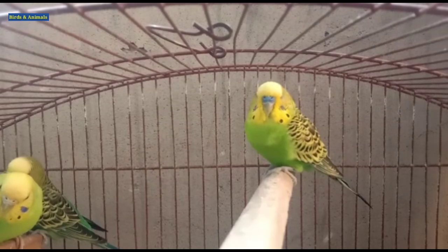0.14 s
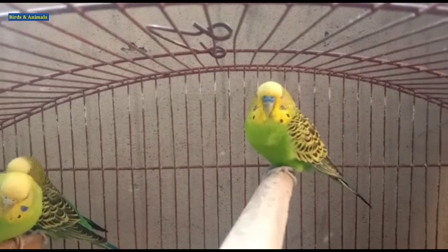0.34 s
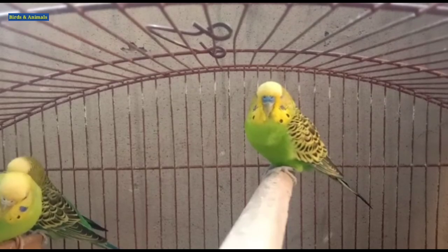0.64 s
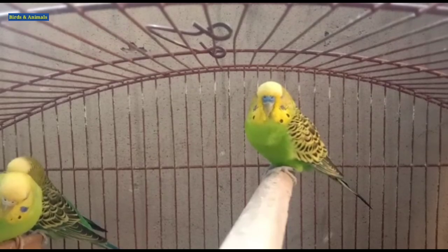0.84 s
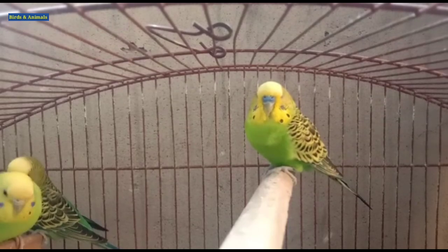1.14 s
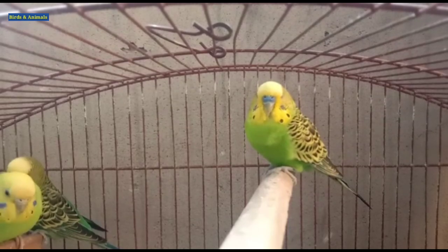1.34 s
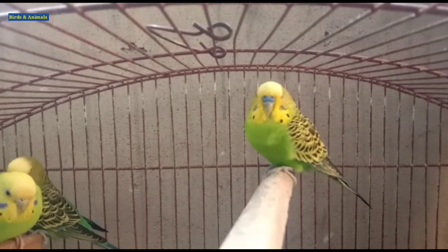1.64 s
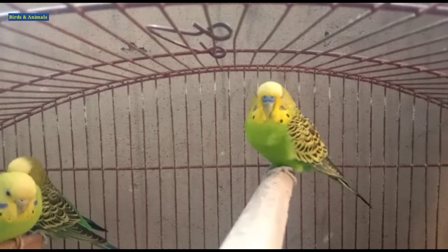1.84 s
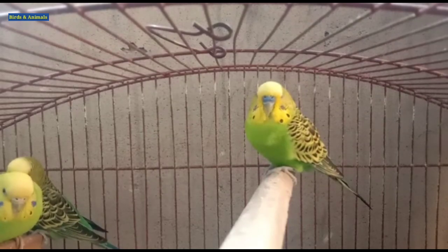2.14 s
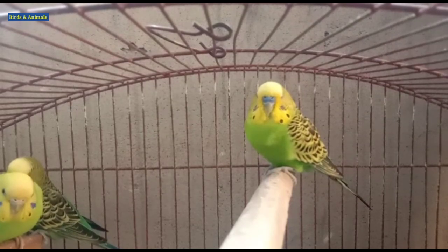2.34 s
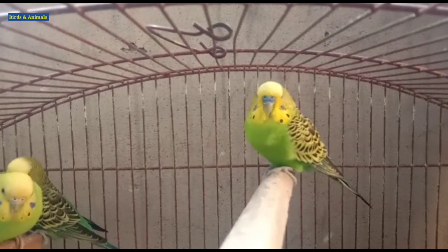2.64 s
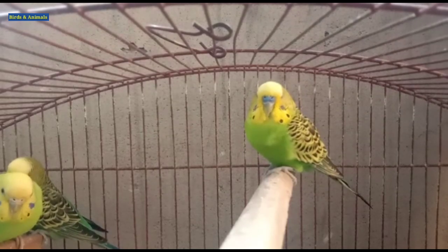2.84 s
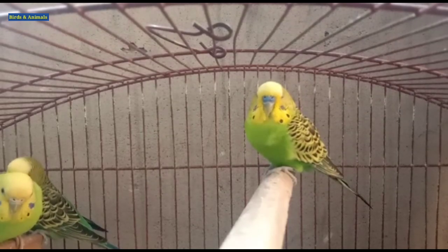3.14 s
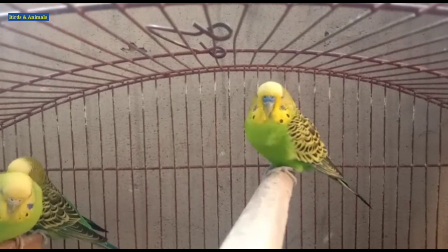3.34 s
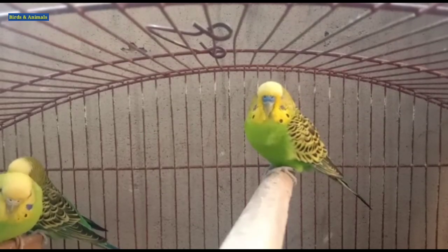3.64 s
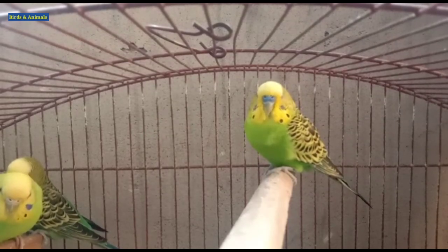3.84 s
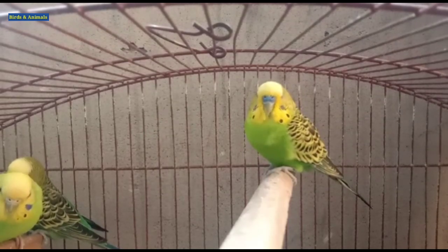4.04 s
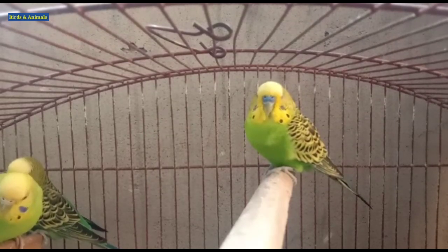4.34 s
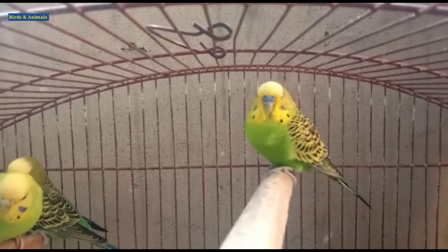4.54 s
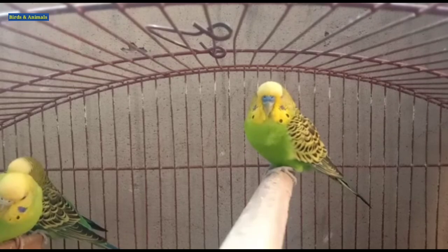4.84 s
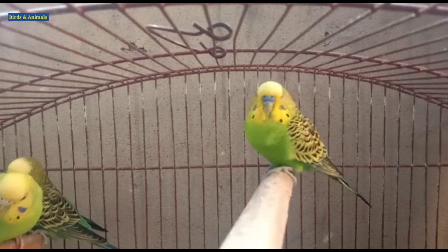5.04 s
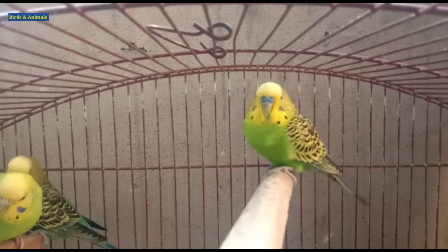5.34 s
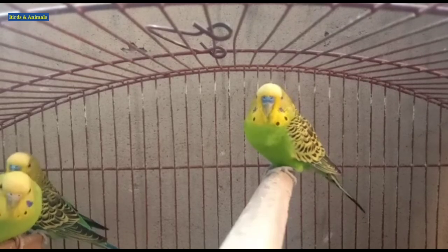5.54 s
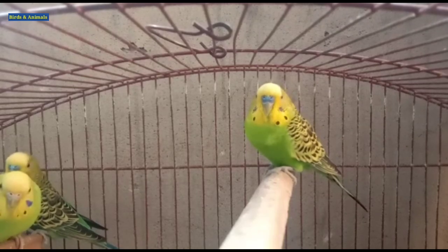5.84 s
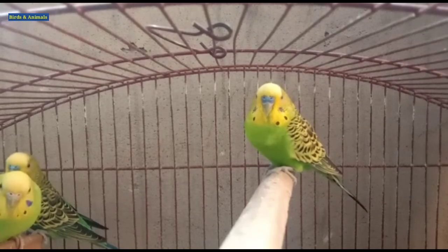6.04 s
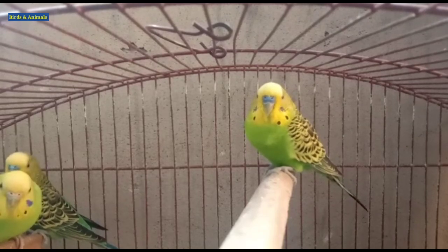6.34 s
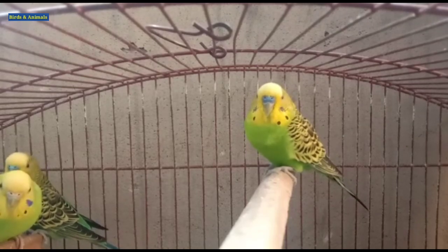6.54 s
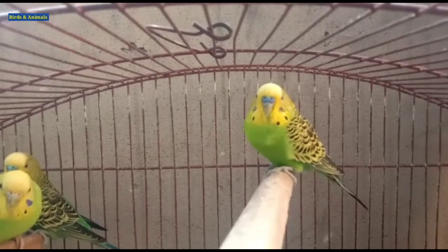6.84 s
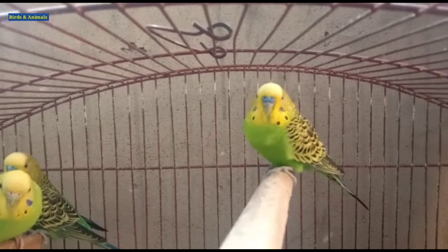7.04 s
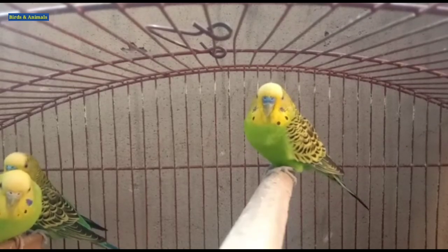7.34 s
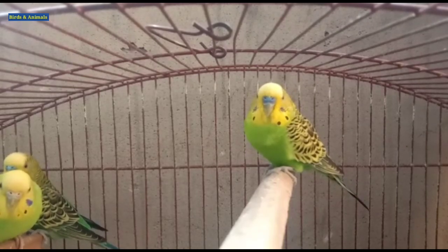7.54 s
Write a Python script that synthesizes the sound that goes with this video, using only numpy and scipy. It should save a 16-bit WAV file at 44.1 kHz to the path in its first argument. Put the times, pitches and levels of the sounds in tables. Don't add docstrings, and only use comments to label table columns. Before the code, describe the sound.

Indoors, one budgerigar in a wire cage chatters in fast, uneven bursts: plunging whistles, arching chirps, croaky and scratchy tones. Tiny beak clicks and dry rattles sit between phrases. After a pause near five seconds, a scratchy call comes with soft hollow thumps, then more warbling and a sharp crackling rattle. The bird is close, with short wall echoes, muffled rumble, a faint whine and very distant peeps.

```python
import sys
import numpy as np
from scipy import signal
from scipy.fft import rfft, irfft
from scipy.io import wavfile
from scipy.ndimage import uniform_filter1d

SR = 44100
rng = np.random.default_rng(int(sys.argv[2]) if len(sys.argv) > 2 else 0)


def gain_from_decibels(decibels):
    exponent = np.asarray(decibels, float) / 20
    return 10 ** exponent


def store_pcm(level_fs):
    pcm = np.round(np.clip(level_fs, -1, 1) * 32767).astype(np.int16)
    wavfile.write(sys.argv[1], SR, np.atleast_2d(pcm).T)


N = 338247


def slow(hz):
    r = np.exp(-2 * np.pi * hz / SR)
    drift = signal.lfilter([1], [1, -2 * r, r * r], rng.standard_normal(N + 4000))[4000:]
    return drift / drift.std()


def resonate(x, hz, width):
    r = np.exp(-np.pi * width / SR)
    zeros = np.array([1, 0, -1]) * (1 - r * r) / 2
    return signal.lfilter(zeros, [1, -2 * r * np.cos(2 * np.pi * hz / SR), r * r], x)


def in_time(rows):
    return gain_from_decibels(np.interp(np.arange(N) / SR, *np.transpose(rows)))


def noise_gate(bird, shut_db=-16, open_db=-52, hold_s=0.067):
    heard = uniform_filter1d(bird ** 2, size=400) > gain_from_decibels(2 * open_db)
    heard = np.roll(heard, -900)
    r = np.exp(-1 / (hold_s * SR))
    opening = np.minimum(2.0 * signal.lfilter([1 - r], [1, -r], heard), 1)
    return gain_from_decibels(shut_db * (1 - opening))


# time in seconds, level in dB.
RUMBLE_CURVE = [(0, -58), (.6, -53), (1.15, -55), (1.6, -49.5), (2.1, -56.5), (2.7, -51.5), (3.2, -56),
                (3.7, -65.5), (4.3, -60.5), (4.8, -55), (5.25, -53), (5.55, -43), (5.85, -63), (6.2, -70),
                (6.7, -60), (7.2, -64.5), (7.67, -51.5)]
# time in seconds, level in dB.
WHINE_CURVE = [(1.2, -94), (1.9, -55), (3.0, -53), (5.35, -61), (5.5, -88)]
# start in seconds, length in seconds, pitch in Hz, level in dB.
DISTANT_PEEPS = [(1.147, 0.17, 2895, -76.5), (1.803, 0.27, 2270, -73.5), (0.998, .18, 1086, -78),
                 (1.757, 0.1, 2630, -78), (1.838, 0.056, 6300, -80.5), (2.9, 0.14, 1260, -63),
                 (3.898, 0.078, 3900, -84), (3.92, 0.078, 3100, -72.5), (5.14, 0.2, 3220, -78)]


def background(gate):
    t, noise = np.arange(N) / SR, rng.standard_normal((4, N))
    low = gain_from_decibels(29.0) * resonate(resonate(noise[0], 96, 44), 76, 52) * gain_from_decibels(4.0 * slow(12.0))
    wash = gain_from_decibels(-52) * resonate(resonate(noise[1], 310, 460), 430, 2500) * gain_from_decibels(0.7 * slow(15))
    whine = gain_from_decibels(20.5) * resonate(resonate(noise[2], 895, 14), 895, 31)
    whine += gain_from_decibels(6.5) * resonate(resonate(noise[3], 800, 100), 850, 190)
    peeps = np.zeros(N)
    for s, length, hz, db in DISTANT_PEEPS:
        sounding = (t > s) * (t < s + length)
        peeps += gain_from_decibels(db + 22.5) * resonate(noise[3] * sounding, hz, 80)
    gated = gate * (in_time(RUMBLE_CURVE) * low + np.sqrt(gate) * wash)
    return gated + in_time(WHINE_CURVE) * gain_from_decibels(3.1 * slow(5.2)) * whine + peeps


# frequency in Hz, level in dB.
THROAT_COLOUR = [(600, -26.5), (1100, -1.5), (2300, -3.5), (3100, 1.5), (4450, -7), (5900, -3.5),
                 (7300, -18), (8400, -25), (10300, -24.5), (12800, -38), (15300, -32), (16500, -63)]


def throat_db(hz):
    colour_hz, colour_db = np.transpose(THROAT_COLOUR)
    return np.interp(np.log(hz), np.log(colour_hz), colour_db)


def through_throat(x, tilt_db, depth=1.05):
    hz = np.arange(1, 1026) * SR / 2050
    cepstrum = irfft(np.log(gain_from_decibels(depth * throat_db(hz) + tilt_db * np.log2(hz / 3000))))
    cepstrum[1:1024] *= 2
    cepstrum[1025:] = 0
    pulse = irfft(np.exp(rfft(cepstrum)))[:512]
    return signal.fftconvolve(x, pulse / np.sqrt(np.sum(pulse ** 2)))[:N]


# peak time in seconds, peak level in dB.
BEAK_CLICKS = [(0.458, -44.5), (1.22, -50), (2.337, -48), (2.919, -46.5), (3.286, -60), (5.395, -36),
               (5.423, -31), (5.436, -33), (5.568, -29), (5.586, -33), (5.624, -40), (5.909, -48),
               (6.501, -32), (6.931, -45), (7.387, -49.5)]
# start in seconds, level in dB, time to fall 60 dB in seconds.
AIR_PUFFS = [
    (0, -32.5, 0.26),
    (2.919, -51.5, 0.18),
    (3.105, -55, 0.41),
    (5.4, -46.5, 1),
    (5.498, -41.5, 0.33),
]


def beak_and_air():
    clicks, puffs, t = np.zeros(N), np.zeros(N), np.arange(N) / SR
    for s, db in BEAK_CLICKS:
        clicks += (t >= s) * gain_from_decibels(db - 60 * np.abs(t - s) / 0.047)
    for s, db, t60 in AIR_PUFFS:
        puffs += (t >= s) * gain_from_decibels(db - 60 * np.abs(t - s) / t60)
    noise = rng.standard_normal((2, N)) * gain_from_decibels(4.3 * slow(90))
    bright = through_throat(clicks * noise[0], tilt_db=0.5, depth=0.55)
    return bright + through_throat(puffs * noise[1], tilt_db=19.5, depth=1.77)


# start in seconds, end in seconds, slaps per second,
# level in dB, unevenness from 0 to 1.
SLAP_TRAINS = [(0.255, 0.27, 1260, -49.5, 0.14), (0.273, 0.297, 500, -29.5, 0.49),
               (0.314, 0.329, 310, -33.5, 0.5), (3.102, 3.16, 750, -52.5, 0.5),
               (3.129, 3.248, 120, -50.5, 0.01), (5.769, 5.855, 118, -47, 0.08),
               (6.371, 6.378, 600, -22.5, 0.3), (6.723, 6.747, 134.5, -45.5, 0.04),
               (6.748, 6.817, 116, -43.5, 0.03)]
# time in seconds, level in dB.
SINGLE_SLAPS = [(6.311, -33), (6.318, -29.5), (6.325, -19), (6.328, -21), (6.333, -16), (6.338, -21),
                (6.343, -23), (6.349, -20), (6.352, -17.5), (6.358, -23), (6.366, -31), (7.569, -43),
                (7.576, -29.5), (7.582, -23), (7.587, -21)]


def rattles():
    slaps = np.zeros(N)
    for s, end, per_s, db, uneven in SLAP_TRAINS:
        chance = rng.standard_normal((40, 2))
        at = s + np.cumsum(np.exp(uneven * chance[:, 0])) / per_s - 1 / per_s
        keep = at < end
        strength = gain_from_decibels(db + 8 * uneven * chance[keep, 1]) * np.sqrt(SR / per_s)
        slaps[(at[keep] * SR).astype(int)] += strength
    s, db = np.transpose(SINGLE_SLAPS)
    slaps[(s * SR).astype(int)] += gain_from_decibels(db + 12.5)
    slaps += .7 * np.roll(slaps, int(.0022 * SR))
    bursts = signal.lfilter([.05], [1, -.98], slaps) * rng.standard_normal(N)
    return through_throat(.5 * slaps + bursts, tilt_db=-2.0, depth=1.21)


def learned(figure, renditions):
    sharper_per_db = .004
    notes = []
    for cue, end, slowness, *parts_db in renditions:
        rows = []
        for part, part_db in zip(figure, parts_db):
            sharper = 1 + sharper_per_db * (part_db + 22)
            for s, hz, glide, db, voice in part:
                rows.append((cue + s * slowness, hz * sharper, glide / slowness, db + part_db, voice))
        untils = [row[0] for row in rows[1:]] + [end]
        for (s, hz, glide, db, voice), until in zip(rows, untils):
            hz_to = max(hz + 1e3 * glide * (until - s), 700)
            notes.append((s, hz, hz_to, db, voice))
    return notes


PHRASE_STOPS = [0.422, 0.636, 0.807, 0.984, 1.252, 1.498, 2.141, 2.266, 2.603, 3.248, 3.454, 3.812, 4.165,
                4.6, 4.677, 4.899, 5.674, 5.739, 5.867, 5.929, 6.074, 6.469, 6.634, 6.691, 6.924, 6.938,
                7.301, 7.601]
# noisy share of the power from 0 to 1, overtones against the
# fundamental in dB, depth of the throb from 0 to 1.
VOICE_QUALITIES = dict(pure=(0.026, -21.5, .22), reedy=(0.02, -9.5, .15), rich=(.015, 4, .1),
                   husky=(.15, -18, .6), croaky=(.15, 1, .4), harsh=(0.6, -20, .5), rasping=(.4, 4, .3),
                   shrill=(.45, 14, .35))
# start in seconds, pitch from in Hz, pitch to in Hz, level in dB.
PURE_NOTES = [(0.463, 3710, 4199, -33.5), (.572, 2407, 2117, -28), (.59, 2095, 1997, -22.5),
              (.938, 2104, 1802, -23), (1.438, 1681, 2118, -21.5), (2.176, 3545, 2965, -33),
              (2.194, 3505, 2827, -39), (2.218, 3366, 2701, -34.5), (2.345, 4150, 4000, -48),
              (3.599, 5750, 5590, -36.5), (3.608, 5412, 5099, -27.5), (3.62, 5128, 4052, -24.5),
              (3.629, 4010, 4104, -23.5), (3.675, 3249, 3378, -13), (3.688, 2937, 2924, -17.5),
              (3.703, 2989, 3018, -16.5), (3.718, 3201, 3189, -13.5), (3.741, 2472, 2352, -14.5),
              (3.757, 2316, 2202, -20), (3.777, 2072, 1970, -21), (4.014, 2088, 1751, -36),
              (4.024, 1724, 1826, -36.5), (4.053, 1849, 2109, -28), (4.098, 2074, 1962, -29.5),
              (4.139, 1892, 1135, -28.5), (5.731, 2830, 3262, -26), (5.917, 3308, 3187, -31.5),
              (5.999, 2360, 2494, -27.5), (6.821, 2660, 2860, -23.5), (6.848, 3417, 3150, -24),
              (6.881, 1954, 2033, -26), (6.905, 2962, 2286, -21.5), (6.915, 2320, 2428, -26.5),
              (7.201, 3190, 2695, -14), (7.21, 2673, 3446, -12), (7.244, 3300, 3050, -14.5),
              (7.636, 2227, 2446, -18)]
REEDY_NOTES = [(.472, 4197, 3391, -24.5), (.485, 3397, 2383, -20.5), (.534, 3110, 2378, -18.5),
               (.736, 1635, 1741, -20), (.882, 2890, 2400, -21), (2.069, 885, 1095, -28.5),
               (2.097, 938, 955.5, -36), (2.252, 1733, 1639, -29), (2.376, 1905, 1474, -28.5),
               (2.382, 1462, 1451, -27), (2.53, 2775, 3469, -13), (2.562, 3350, 2590, -13),
               (3.433, 1992, 1505, -29), (4.155, 1175, 1241, -31), (5.6, 3656, 2783, -27),
               (5.638, 1969, 1824, -33.5), (5.946, 1457, 1534, -34.5), (6.06, 1636, 1458, -35),
               (6.447, 2105, 1566, -27.5), (6.456, 1560, 1506, -24), (6.607, 2041, 1950, -30),
               (1.364, 1500, 1100, -30), (6.505, 3381, 3760, -24), (6.566, 1917, 1257, -23.5),
               (6.59, 3318, 2240, -18), (6.674, 1593, 1894, -21.5), (7.616, 1605, 1295, -26.5)]
RICH_NOTES = [(0.664, 1927, 1813, -21), (0.693, 1547, 1086, -29.5), (1.235, 1531, 1494, -19.5),
              (2.002, 1067, 910, -22), (2.03, 895.5, 1081, -26.5), (2.049, 1026, 836, -32),
              (2.518, 3593, 2743, -21), (2.523, 2758, 2789, -14.5), (6.42, 880, 1152, -15.5),
              (6.426, 1148, 936, -15), (6.435, 950, 1157, -18.5), (6.528, 3078, 1937, -22.5),
              (6.932, 1990, 1758, -21.5)]
HUSKY = [(0.515, 3114, 3052, -17.5), (.618, 1400, 1200, -37), (.779, 4259, 3597, -12),
         (0.844, 3259, 2636, -35), (.922, 2414, 2526, -24), (.973, 1643, 1300, -32.5),
         (1.309, 2992, 3510, -37), (1.313, 3508, 2703, -30.5), (1.318, 1760, 1701, -32),
         (1.328, 2098, 2607, -38), (1.335, 2708, 3056, -33.5), (1.34, 2146, 1751, -33),
         (1.35, 1754, 1532, -36), (1.393, 2597, 3038, -27), (1.4, 2952, 2446, -28),
         (1.412, 2606, 2957, -28), (1.418, 2896, 2404, -28.5), (1.46, 3057, 2965, -21.5),
         (1.468, 2850, 2152, -27.5), (1.476, 2196, 1900, -25), (2.371, 3530, 2018, -41),
         (3.73, 2933, 2907, -22), (2.235, 1991, 2592, -36), (2.244, 2596, 1467, -24),
         (3.226, 2600, 2028, -41), (4.876, 1907, 1611, -17), (4.892, 1150, 1030, -34),
         (5.848, 2390, 2963, -27), (5.853, 2859, 2243, -26.5), (5.956, 1945, 2044, -36.5),
         (5.971, 2386, 3362, -29.5), (5.976, 3333, 2830, -31.5), (5.989, 2515, 2300, -36.5),
         (6.01, 3053, 3563, -33.5), (6.026, 3586, 2887, -35.5), (6.046, 2410, 1890, -37),
         (6.682, 2897, 3135, -18.5), (6.843, 1570, 1424, -28.5), (6.871, 3157, 1920, -26.5),
         (6.9, 1897, 3353, -26.5), (7.294, 2246, 986, -28), (7.586, 2428, 2880, -27),
         (7.651, 1910, 2600, -33.5)]
CROAKY_NOTES = [(0.369, 715.6, 883.5, -25), (.387, 860, 1524, -26), (.411, 1720, 1630, -26.5),
                (.612, 1904, 1500, -20), (0.745, 2830, 3001, -15), (.865, 1624, 1543, -24),
                (1.484, 1805, 1493, -25), (1.383, 1104, 1888, -32), (1.49, 1294, 1101, -34.5),
                (2.583, 1981, 1759, -21), (3.448, 1607, 1794, -37), (3.645, 2294, 1344, -25.5),
                (3.654, 1341, 1253, -29.5), (3.802, 1931, 1887, -35.5), (5.578, 2652, 2525, -24),
                (5.668, 1491, 2330, -30.5), (5.721, 1583, 1863, -25.5), (6.574, 1285, 1642, -26.5),
                (6.584, 2290, 3282, -23)]
HARSH = [(.506, 2287, 3390, -20.5), (.756, 3102, 3991, -29.5), (.794, 3595, 2901, -13),
         (3.64, 4123, 3589, -30.5), (3.661, 2809, 2098, -24.5), (3.669, 2215, 2879, -26.5),
         (2.546, 3166, 4341, -22), (4.565, 3161, 3930, -17.5), (5.459, 3465, 3405, -33.5),
         (5.498, 3979, 3600, -23.5), (5.56, 1283, 1812, -31), (6.836, 3025, 1360, -18.5),
         (7.228, 3510, 2328, -30), (7.236, 2510, 3630, -25), (7.282, 2843, 1824, -16)]
RASPING_NOTES = [(4.521, 1697, 2396, -28), (4.53, 2791, 3108, -22), (4.575, 3758, 3415, -21.5),
                 (4.633, 1499, 2300, -30), (4.639, 2400, 3400, -20), (4.65, 3430, 3301, -15),
                 (4.665, 3224, 3124, -16), (5.465, 3281, 3360, -17), (5.477, 3381, 3523, -10),
                 (5.511, 3352, 3420, -33), (5.595, 3036, 3504, -31), (5.631, 3250, 1671, -28)]
SHRILL_NOTES = [(0.761, 2530, 3080, -15), (0.77, 3103, 2685, -14.5), (4.543, 2873, 3019, -9.5)]
# seconds after the cue, pitch in Hz, glide in kHz per second,
# level within the part in dB, voice.
DIVE_FIGURE = [
    [(-.036, 4950, 45, -2, "pure"), (-.028, 5318, -95.5, -3, "pure"), (-.015, 4181, 0, -15.5, "husky")],
    [(-.001, 2700, -190, -1.5, "husky"), (.006, 1330, -5, -4, "reedy"), (.017, 1250, 3, -13, "reedy")],
]
ARCH_FIGURE = [
    [(-.020, 3300, 40, -12.5, "pure"), (-.010, 3700, -95.5, -10.5, "husky"), (0.0, 2750, 9.5, 1, "pure"),
     (.023, 2976, 45, 0.5, "pure"), (.033, 3450, -73.5, -4.5, "husky")],
    [(.047, 2350, -20, -3.5, "husky"), (.057, 2150, -7.5, 1.5, "pure")],
]
SLIDE_FIGURE = [
    [(-.023, 4908, 25, -10, "pure"), (-.012, 5150, -120, -14, "pure"), (0.0, 3660, -30.5, 2, "pure"),
     (.013, 3314, -22, 3.5, "pure"), (.034, 2750, -28, -4.5, "husky"), (.044, 2480, -6, 1, "pure"),
     (.058, 2237, -45.5, -3.5, "croaky"), (.069, 2950, 9, 2, "pure"), (.082, 3089, -14, 0, "pure"),
     (.094, 2600, -2, -0.5, "reedy")],
    [(.129, 2382, -64, 0.74, "croaky")],
]
# cue in seconds, end in seconds, slowness as a factor,
# first part level in dB, second part level in dB.
DIVE_CUES = [(2.759, 2.78, 0.91, -19.5, -29.5), (3.321, 3.329, .72, -57, -39), (4.757, 4.773, 1, -19, -24),
             (7.051, 7.07, 0.93, -16.5, -21.5)]
ARCH_CUES = [(2.417, 2.509, 0.91, -24, -27.5), (2.806, 2.881, 0.92, -31, -32),
             (3.355, 3.431, 1.04, -37, -30.5), (4.795, 4.876, 1.03, -14.5, -25),
             (7.091, 7.188, 0.92, -17.5, -24.5)]
SLIDE_CUES = [(1.564, 1.707, .98, -20, -26), (4.224, 4.371, 1.01, -22, -29)]


def controls():
    tables = (PURE_NOTES, REEDY_NOTES, RICH_NOTES, HUSKY, CROAKY_NOTES, HARSH, RASPING_NOTES, SHRILL_NOTES)
    notes = [(*row, voice) for table, voice in zip(tables, VOICE_QUALITIES) for row in table]
    notes += learned(DIVE_FIGURE, DIVE_CUES) + learned(ARCH_FIGURE, ARCH_CUES)
    notes += learned(SLIDE_FIGURE, SLIDE_CUES)
    notes.sort()
    stops = [row[0] for row in notes] + [row[1] for row in DIVE_CUES + ARCH_CUES + SLIDE_CUES]
    stops = np.sort(stops + list(PHRASE_STOPS) + [N / SR])
    out, bends = np.tile([[0.], [-20], [0], [0]], N), []
    for s, hz_from, hz_to, db, voice in notes:
        a, b = int(s * SR), int(stops[stops > s][0] * SR)
        share, over_db, throb = VOICE_QUALITIES[voice]
        over_db = over_db - 1.5 * np.log2(hz_from / 2500)
        out[:, a:b] = [[gain_from_decibels(db)], [over_db], [share], [throb]]
        bends += [(a, np.log(hz_from)), (b - 1, np.log(hz_to))]
    log_hz = np.interp(np.arange(N), *np.transpose(bends))
    rounding = (70, 140, 150, 100, 100)
    return [uniform_filter1d(row, size) for row, size in zip((log_hz, *out), rounding)]


# time in seconds, level in dB.
BEAK_FACING = [(.3, 1.5), (.7, 2.5), (.95, 3.5), (1.4, -6.5), (1.65, 1.5), (2.1, -9.5), (2.55, 2),
               (2.8, -6), (3.4, 9), (3.7, -4), (4.1, -14.5), (4.3, -9.5), (4.6, -1), (4.85, -6), (5.5, -1),
               (6.0, -9.5), (6.55, -6.5), (7.05, -15.5), (7.6, -25)]
# frequency in Hz, level in dB.
OPEN_BEAK = [(7600, -39), (8600, -12.5), (10300, -2), (11600, -8.5), (12500, -16.5), (13800, -7),
             (15200, -0.5), (16000, -30.5)]


def warble(fall_db=-6.0, air=0.23, beat_hz=195, sizzle_db=-33, sheen_db=-30, order=8):
    log_hz, level, over_db, rough, throb = controls()
    rough = np.clip(rough, 0, 1)
    level = level / (1 + (np.gradient(log_hz) / 0.012) ** 2)
    level = uniform_filter1d(level, size=50)
    shaky = .011 * (1 + 9 * rough) + .008 / (1 + (level / .03) ** 2)
    hz = np.exp(log_hz + shaky * slow(60) + .09 * rough * slow(350))
    phase = 2 * np.pi * np.cumsum(hz) / SR

    k = np.arange(2, 15)[:, None]
    weights = gain_from_decibels(1.19 * throat_db(k * hz) + fall_db * np.log2(k)) * (k * hz < .38 * SR)
    unsteady = gain_from_decibels(3.5 * slow(70) - 1)[(np.arange(N) + 9000 * k) % N]
    overtones = np.sum(weights * unsteady * np.sin(k * phase + k ** 2), axis=0)
    overtones /= np.sqrt(np.sum(weights ** 2, axis=0))

    beak_hz, beak_db = np.transpose(OPEN_BEAK)
    shine = gain_from_decibels(np.interp(np.log(k * hz), np.log(beak_hz), beak_db, right=-99) + sheen_db)
    sheen = np.sum(shine * unsteady * np.sin(k * phase), axis=0)
    sheen = sheen * (.8 + .6 * slow(300)) * in_time(BEAK_FACING)

    beaded = gain_from_decibels(2.2 * slow(75)) * np.sin(phase)
    tone = (beaded + gain_from_decibels(over_db) * overtones) * np.sqrt(2 / (1 + gain_from_decibels(2 * over_db)))
    smear = tone * slow(250)
    breath = through_throat(rng.standard_normal(N), tilt_db=12.5, depth=1.5)
    breath *= gain_from_decibels(1.1 * np.minimum(over_db + 7.0, 8.0))
    beat_phase = 2 * np.pi * np.cumsum(beat_hz * (1 + 0.072 * slow(27.84))) / SR
    beats = 1 + throb * np.cos(beat_phase)

    fizz_band = signal.butter(5, [14300, 15700], "band", fs=SR, output="sos")
    sizzle = signal.sosfilt(fizz_band, rng.standard_normal(N))
    sizzle *= gain_from_decibels(sizzle_db + 7.0 * slow(14))
    sizzle *= in_time(BEAK_FACING) * np.minimum(level / .07, 1.5)

    noisy = 0.59 * smear + air * breath
    voice = np.sqrt(1 - rough) * tone + np.sqrt(rough) * noisy + sizzle + sheen
    return signal.sosfilt(signal.butter(order, 880, "high", fs=SR, output="sos"), level * beats * voice)


# start in seconds, level in dB, resonance in Hz.
PERCH_KNOCKS = [
    (5.404, -23, 397),
    (5.426, -19, 238),
    (5.434, -23, 330),
    (5.465, -31, 414),
    (5.52, -34.5, 446),
    (5.599, -41.5, 420),
    (5.659, -53, 437),
]


def perch():
    t, noise = np.arange(N) / SR, rng.standard_normal(N)
    knocks = np.zeros(N)
    for s, db, hz in PERCH_KNOCKS:
        thud = noise * (t >= s) * gain_from_decibels(db + 13.5 - 60 * np.abs(t - s) / 0.096)
        knocks += resonate(thud, hz, 160)
    return knocks


# delay in seconds, level in dB, scatter as a share of the delay.
EARLY_ECHOES = [
    (.0023, -18, .05),
    (0.0135, -17, .1),
    (.024, -19, .3),
]


def room(x):
    t60_s, high_t60_s, tail_db = 0.21, 0.041, -22.5
    t = np.arange(int(.4 * SR)) / SR
    noise = rng.standard_normal(len(t)) * gain_from_decibels(-60 * t / t60_s) * (t > .005)
    dull = signal.lfilter([.4], [1, -.6], noise)
    dull = signal.lfilter([.5], [1, -.5], dull)
    tail = dull + (noise - dull) * gain_from_decibels(-60 * t / high_t60_s)
    response = gain_from_decibels(tail_db) * tail / np.sqrt(np.sum(tail ** 2))
    response[0] = 1
    for s, db, scatter in EARLY_ECHOES:
        wide = np.exp(-((t - s) / (scatter * s)) ** 2) * rng.standard_normal(len(t))
        wide = signal.sosfilt(signal.butter(2, 6500, fs=SR, output="sos"), wide)
        response += gain_from_decibels(db) * wide / np.sqrt(np.sum(wide ** 2))
    return signal.fftconvolve(x, response)[:N]


def scene():
    near = room(gain_from_decibels(-3.0) * warble() + rattles() + beak_and_air() + perch())
    return (near + background(noise_gate(near)))[None]


def roll_off(x):
    return signal.sosfilt(signal.butter(12, 16840, fs=SR, output="sos"), x)


def record(dry):
    top_cut = signal.butter(10, 15900, fs=SR, output="sos")
    mix = signal.sosfilt(top_cut, 1.054 * dry)
    return roll_off(mix)


dry = scene()
out = record(dry)
store_pcm(out)
```